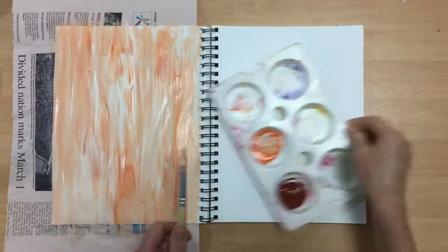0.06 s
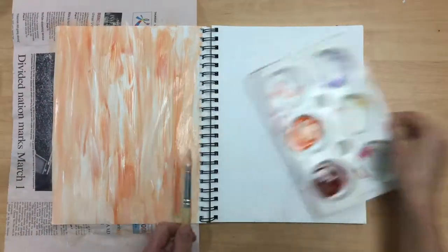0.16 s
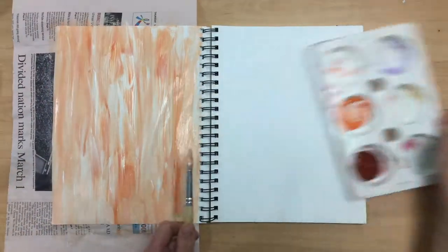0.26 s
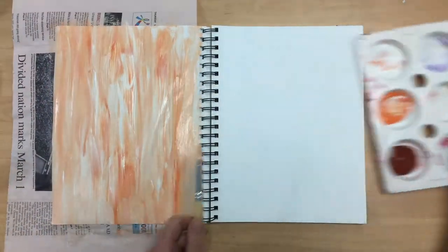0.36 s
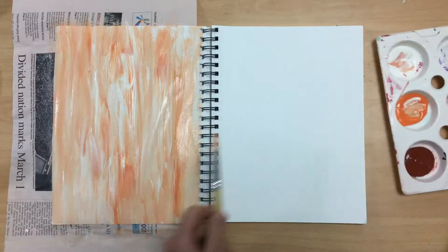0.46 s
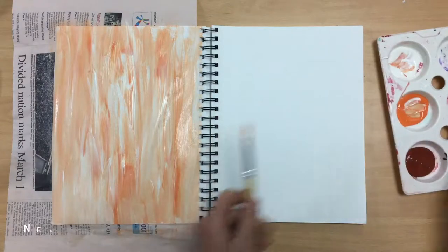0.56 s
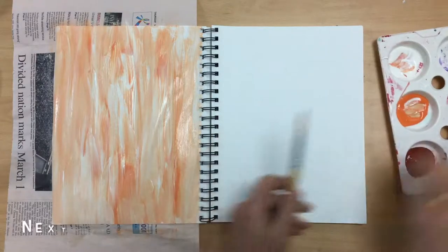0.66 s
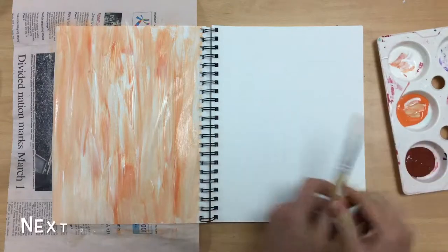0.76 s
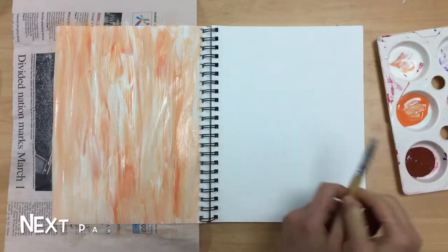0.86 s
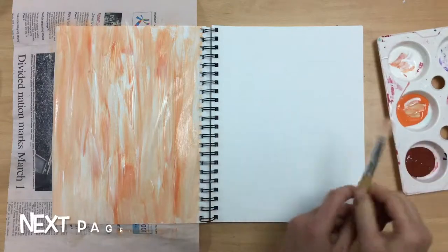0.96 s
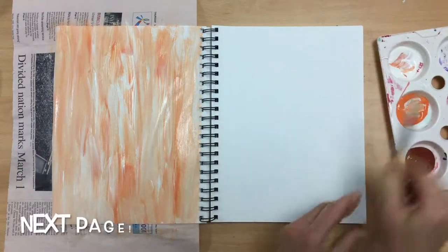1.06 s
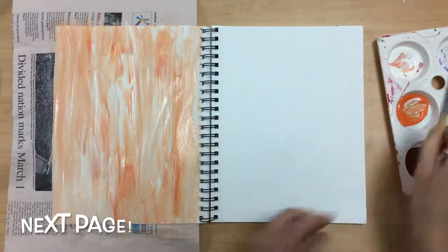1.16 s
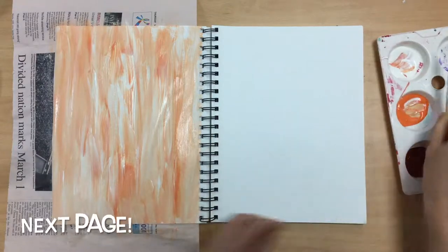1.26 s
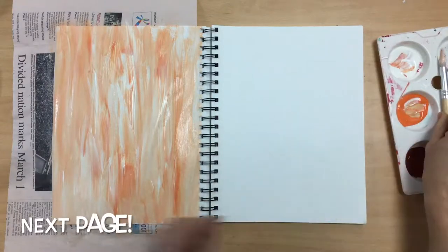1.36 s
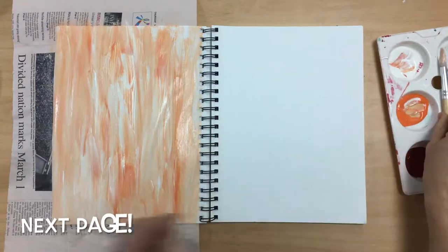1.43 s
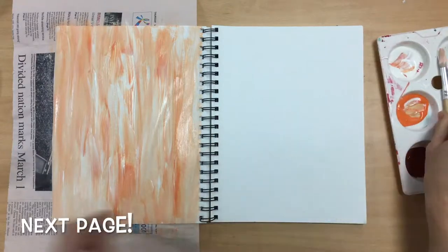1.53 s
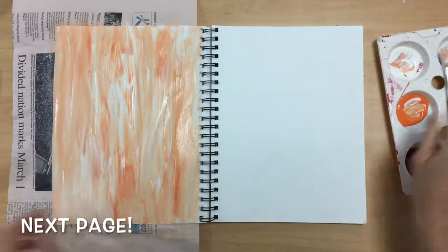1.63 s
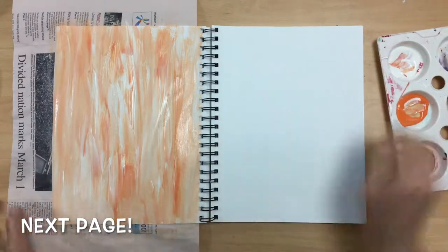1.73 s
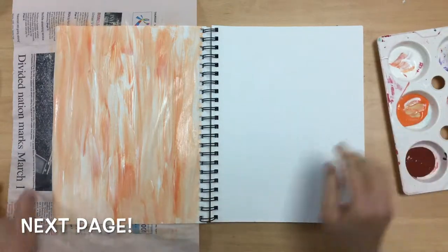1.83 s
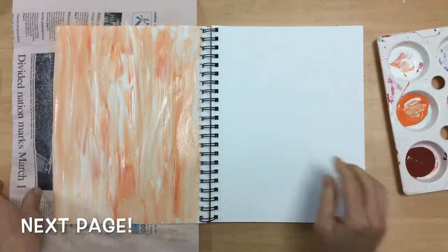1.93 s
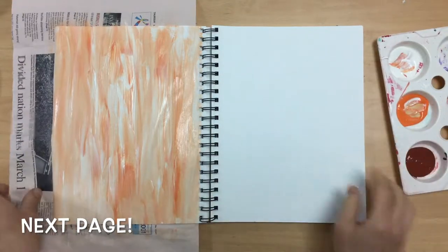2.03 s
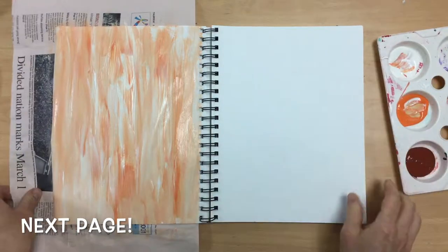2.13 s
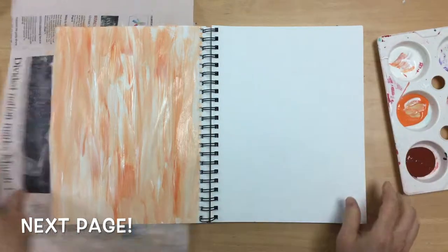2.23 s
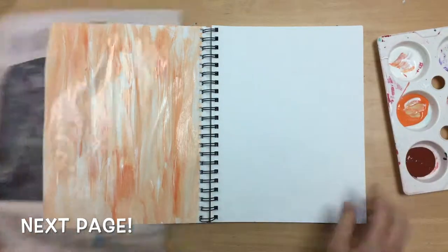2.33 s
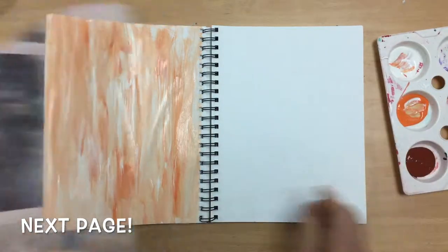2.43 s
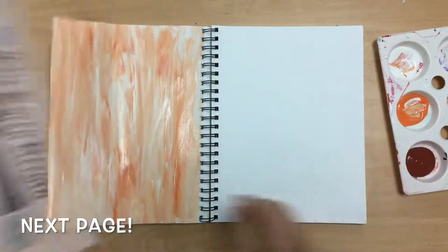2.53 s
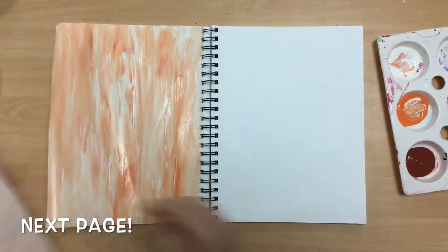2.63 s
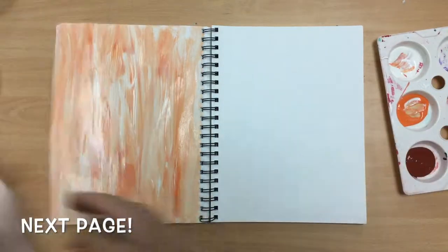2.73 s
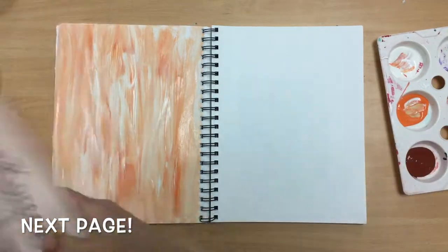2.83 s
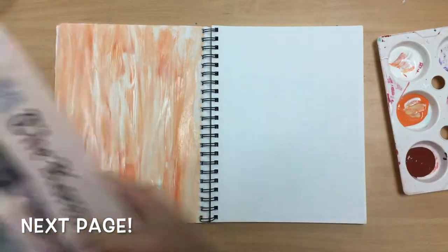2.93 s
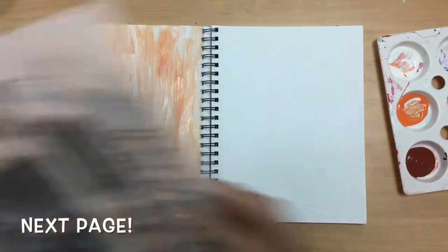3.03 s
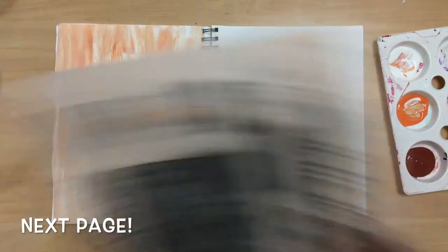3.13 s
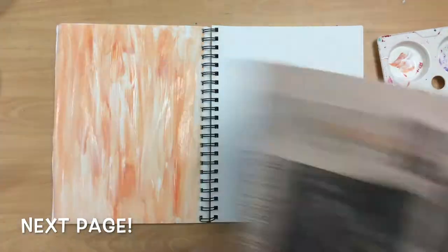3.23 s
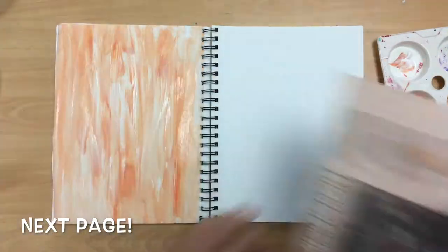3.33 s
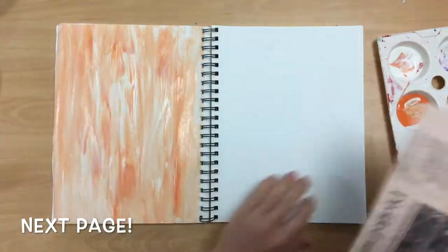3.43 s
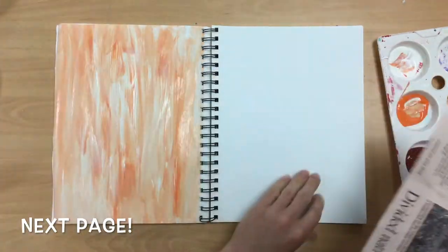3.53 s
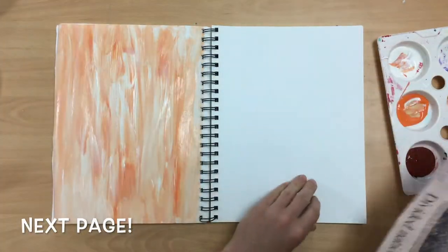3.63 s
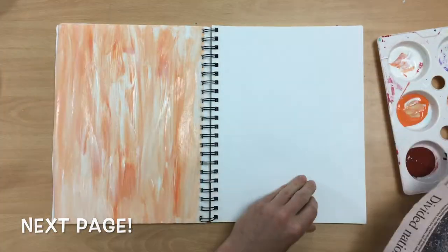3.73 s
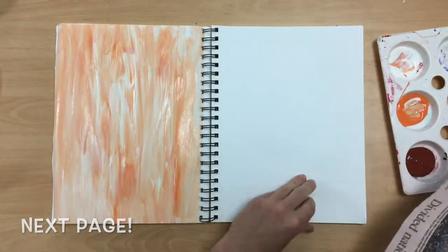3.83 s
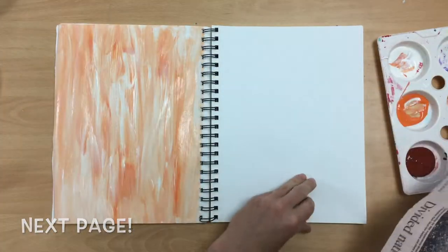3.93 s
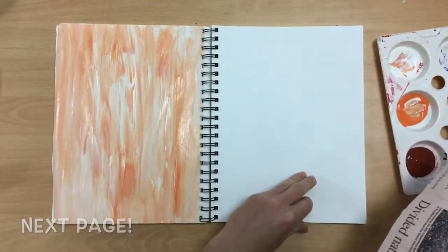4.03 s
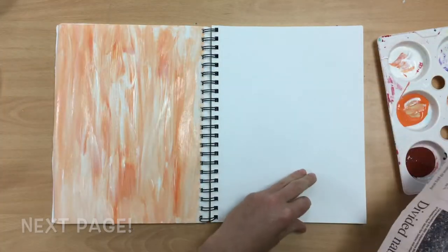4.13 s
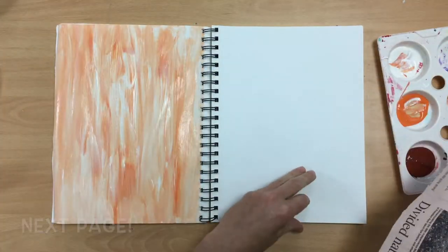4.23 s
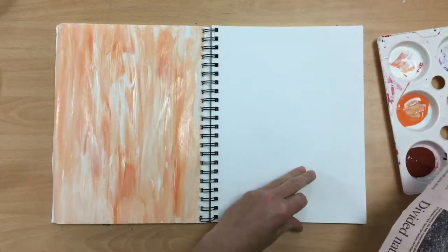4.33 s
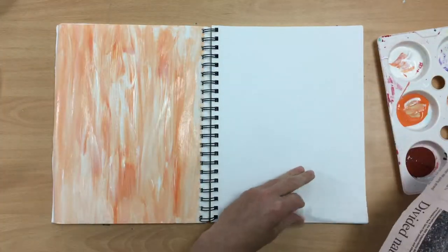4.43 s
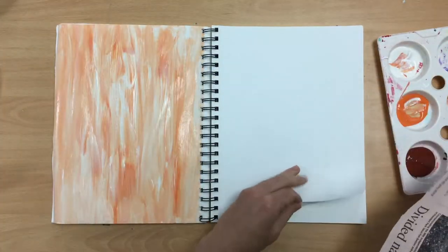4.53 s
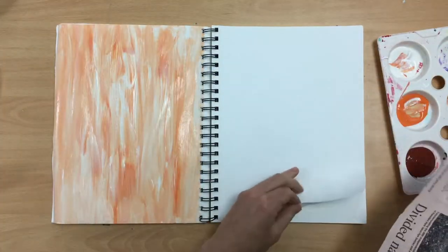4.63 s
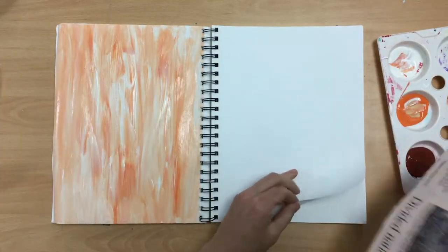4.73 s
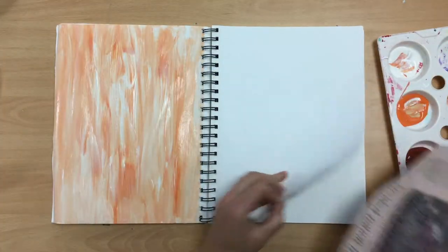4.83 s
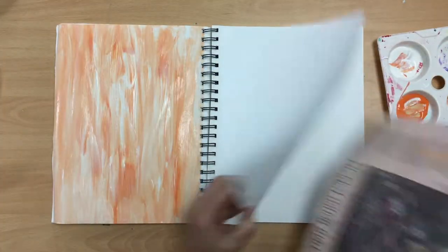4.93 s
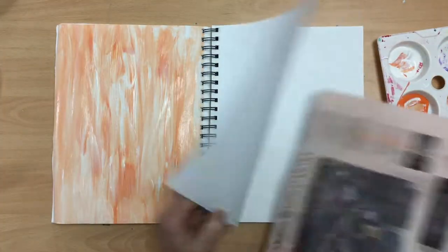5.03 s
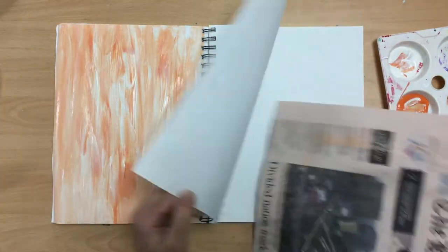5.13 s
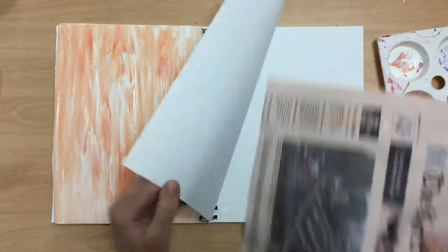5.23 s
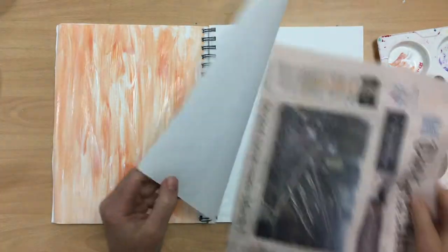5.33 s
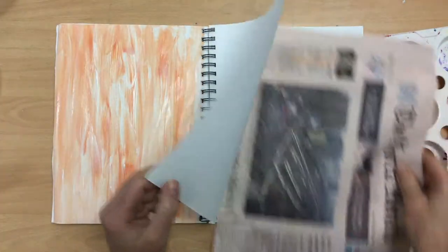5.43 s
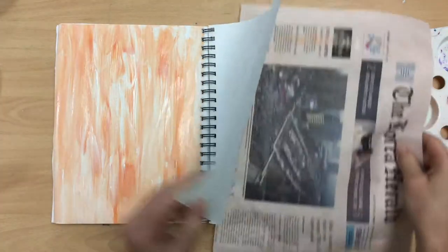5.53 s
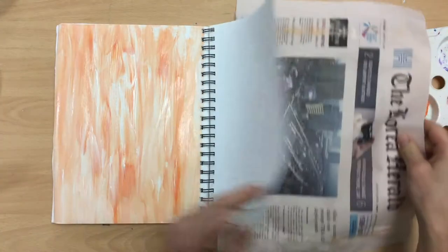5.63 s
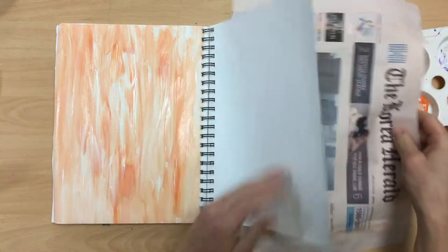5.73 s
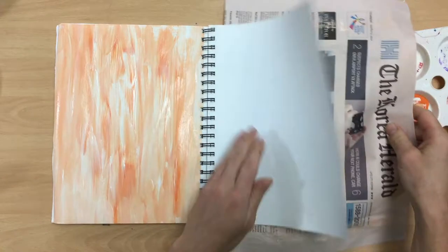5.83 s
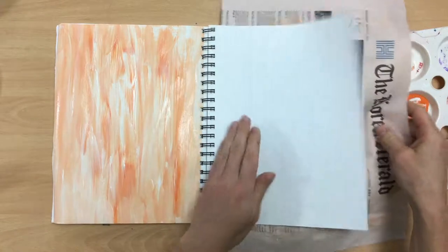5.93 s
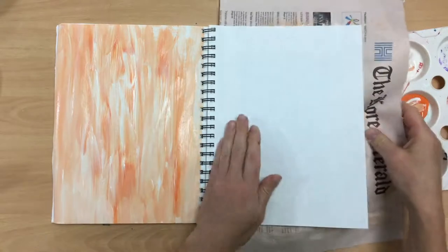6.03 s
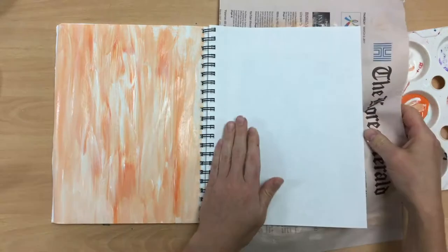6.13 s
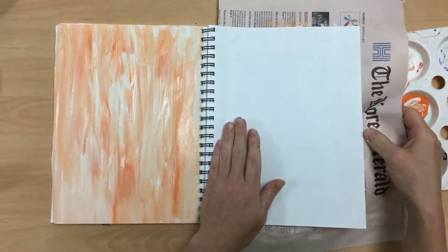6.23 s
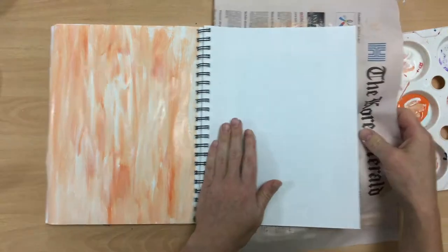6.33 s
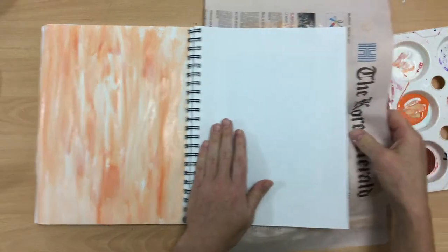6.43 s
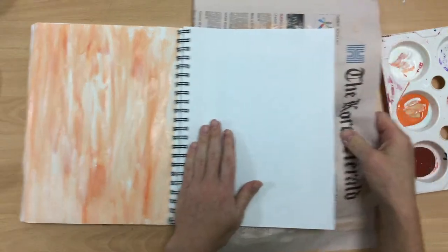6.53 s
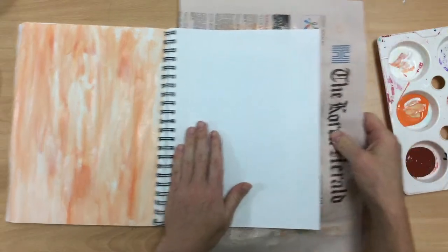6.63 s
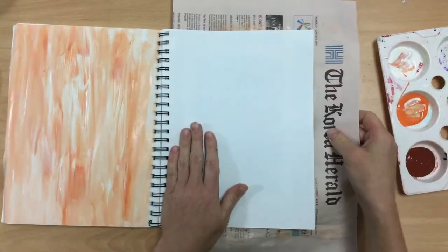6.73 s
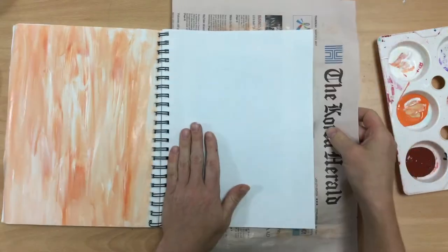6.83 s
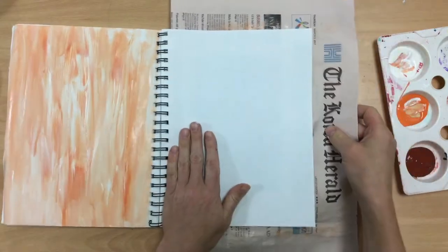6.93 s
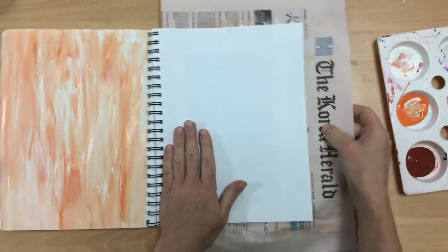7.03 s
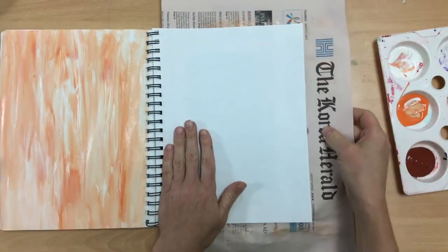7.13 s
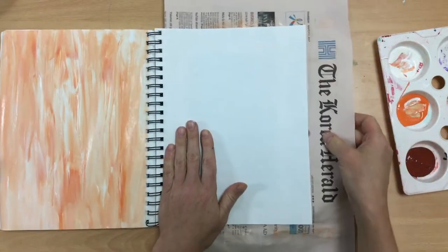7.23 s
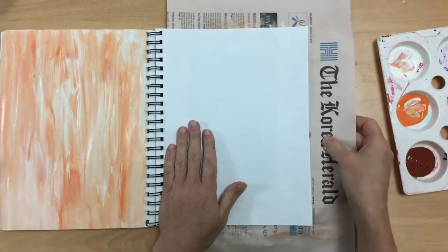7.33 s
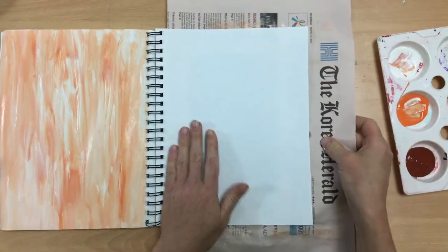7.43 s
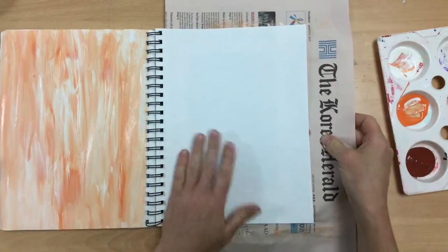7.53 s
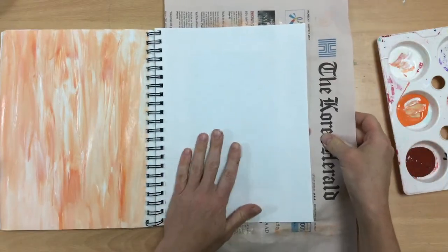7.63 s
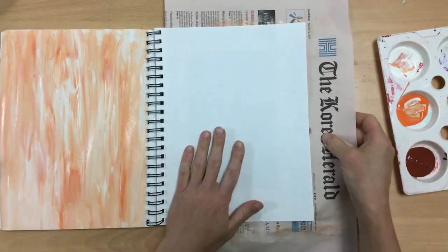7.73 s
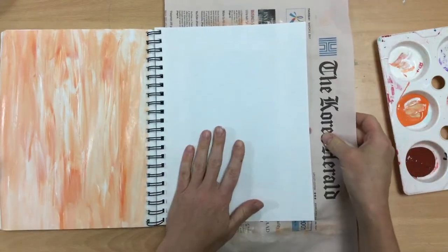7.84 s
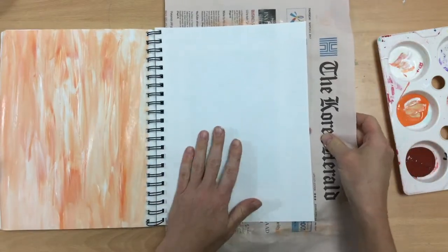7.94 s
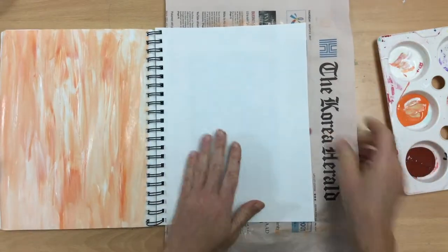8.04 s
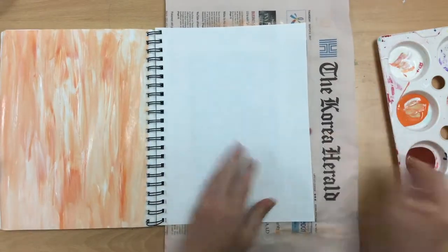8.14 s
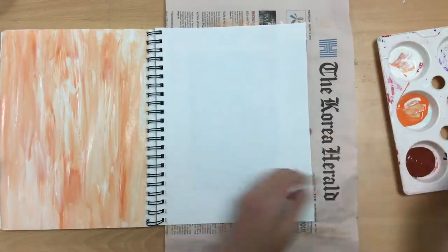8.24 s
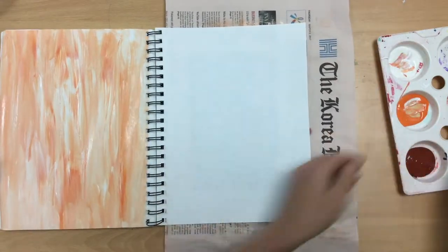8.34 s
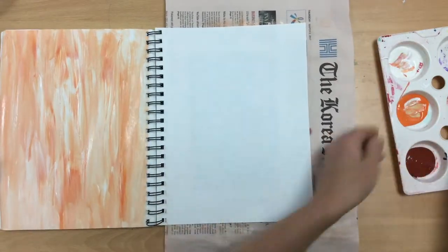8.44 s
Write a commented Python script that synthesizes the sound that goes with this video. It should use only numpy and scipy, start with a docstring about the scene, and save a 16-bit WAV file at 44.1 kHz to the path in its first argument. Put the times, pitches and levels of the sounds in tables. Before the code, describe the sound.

Close by, hard plastic clacks and light brush taps give way to loud newspaper rustling, then softer page turning and smoothing over a low hum.

```python
"""A wooden table in a small room, heard close: the direct sound outweighs the echoes, and a machine hums low.
First a plastic palette is slid off a sketchbook and set down, and a brush drops into it and rolls:
short clacks over quickly dying resonances. From about 2 s a sheet of newspaper is pulled out from under a page,
waved across and pushed in under the next page, which a hand pats flat: friction, crackles, flapping and snaps.
Sine tones make the hum and filtered noise the air of the room, throughout."""
import sys
import numpy as np
from scipy import signal
from scipy.fft import rfft, irfft
from scipy.io import wavfile
from scipy.ndimage import uniform_filter1d

SR = 44100
rng = np.random.default_rng(int(sys.argv[2]) if len(sys.argv) > 2 else 0)


def generate_wav(signal):
    """Clip the signal to [-1, 1] and save it as 16-bit WAV at the path in sys.argv[1]."""
    frames = np.transpose(np.atleast_2d(signal))
    scaled = np.clip(frames, -1, 1) * 32767
    pcm = np.round(scaled).astype(np.int16)
    wavfile.write(sys.argv[1], SR, pcm)


N = 373527  # samples
BINS = np.fft.rfftfreq(4096, 1 / SR)  # Hz, the grid of every colour filter

# How the body of a sheet colours rubbing: hz, gain_db
RUB_COLOUR = [(100, -36), (300, -28.5), (550, -1.5), (800, -5), (1100, 0), (1500, -1), (2400, -1),
              (3500, -4.5), (5000, -11), (8000, -17), (15000, -39.5)]
# The swish of a slack edge: hz, gain_db
SWISH_COLOUR = [(300, -47.5), (1500, -22), (2800, -5), (4400, 1), (6500, -1.5), (9000, -7), (15500, -20)]
# The fizz of a taut edge: hz, gain_db
FIZZ_COLOUR = [(1000, -47), (4000, -11.5), (7500, 2), (10000, 1), (13000, 1.5), (15500, -10.5)]
# Broad folds flapping: hz, gain_db
FLAP_COLOUR = [(40, -42.5), (120, -21), (200, -5), (300, 3), (420, 0), (650, -18.5), (1100, -16.5),
               (4000, -51)]
# How freely the newspaper hangs: time_s, freedom (0 = pressed flat, 1 = in the air)
FREEDOM = [(1.9, .2), (2.1, 0.35), (2.52, .4), (2.62, 1), (3.1, 1), (3.35, 0.92), (3.6, 0.00027),
           (5.3, 0.1), (6.05, 0.71), (6.4, 0.053)]
FLAP_LYING_DB, FLAP_FREE_DB = -19.5, -1.5  # flapping against the rub
CRINKLE_LYING, CRINKLE_FREE = .35, 1  # crackling share of the rustle, 0-1
SPAN_WIDTH_HZ, SPAN_DB = 1000, -3  # the broad resonance of the bent span


def rustle(rub_db=-2.0, hiss_db=0, hiss_crackle=.45, tick_db=-2, crease_db=-5):
    """Fibre friction and crackles drive the sheet's body, its edge and its broad folds."""
    rub_gain, swish_gain, fizz_gain, span_hz = stroke_levels()
    free = np.interp(np.arange(N) / SR, *np.transpose(FREEDOM))
    share = CRINKLE_LYING + (CRINKLE_FREE - CRINKLE_LYING) * free
    ticks = crackles(per_s=760, spread_db=2.0, decay_s=.0004)
    facets = folds(low_hz=400, high_hz=7000, per_s=1000, spread_db=4.2, cycles=3.2, count=36)

    # the body of the sheet: buckling facets and ticks over smooth friction
    rub_colour = read(RUB_COLOUR, BINS)
    buckling = unit(colour(bend(facets, drift_db=6.5), rub_colour))
    grains = unit(buckling + amp(tick_db) * unit(colour(ticks, rub_colour)))
    friction = unit(colour(bend(rng.standard_normal(N), drift_db=5.5), rub_colour))
    rub = (np.sqrt(share) * grains + np.sqrt(1 - share) * friction) * rub_gain
    rub = rub + amp(SPAN_DB) * resonate(rub, span_hz, SPAN_WIDTH_HZ)

    # the sliding edge: sparks and smooth noise, heard as swish and brighter fizz
    edge_share = hiss_crackle * share
    small_facets = folds(low_hz=2820, high_hz=14700, per_s=590, spread_db=5.5, cycles=5.0, count=16)
    sparks = unit(ticks + small_facets)
    smooth = unit(bend(rng.standard_normal(N), drift_db=1.5))
    edge = np.sqrt(edge_share) * sparks + np.sqrt(1 - edge_share) * smooth
    swish = unit(colour(edge, read(SWISH_COLOUR, BINS))) * swish_gain
    fizz = unit(colour(edge, read(FIZZ_COLOUR, BINS))) * fizz_gain
    hiss = swish + fizz

    # small creases snap at random, louder the freer the sheet
    creases = crackles(per_s=60, spread_db=3.5, decay_s=.0012)
    creases = unit(colour(creases, read(SNAP_COLOUR, BINS))) * rub_gain * np.sqrt(share)

    # broad folds flap low, as hard as the sheet is moved
    flap = crackles(per_s=270, spread_db=-0.5, decay_s=.002)
    flap = unit(colour(flap, read(FLAP_COLOUR, BINS))) * rub_gain
    flap *= amp(FLAP_LYING_DB + (FLAP_FREE_DB - FLAP_LYING_DB) * free)

    rustling = amp(rub_db) * rub + amp(hiss_db) * hiss + amp(crease_db) * creases + flap
    return rustling * catching(depth_db=1.56, per_s=90)


# Each movement that slides or bends a sheet, in order: palette dragged off the page, brush carried over,
# newspaper gripped and pulled out, waved across, fingers at the page corner, page lifted and newspaper
# put under it, both pushed into place, hand smoothing the page and letting go. Levels before the mix gains:
# start_s, rise_s, hold_s, rub_db, edge_db, fizz_against_swish_db, resonance_hz
STROKES = [ (.02, 0.027, .01, -88, -81, 1, 2400), (0.074, 0.017, 0.18, -72.5, -69, 3, 1600),
           (.17, 0.072, 0.017, -72, -58.5, -1.5, 2400), (0.3, 0.044, 0.051, -74, -63.5, 0, 4000),
           (0.523, 0.028, .01, -90, -77, -8, 2500), (0.918, 0.042, .02, -98, -88, 5.5, 2487),
           (1.967, 0.023, 0.0046, -62.5, -68, 4, 1300), (2.084, 0.014, 0.065, -57.5, -57, -6, 3800),
           (2.177, 0.083, 0.033, -57, -57.5, -4.5, 3460), (2.285, 0.051, 0.17, -52.5, -53.5, -1.5, 1610),
           (2.57, 0.035, 0.14, -56.5, -64.5, -8, 1100), (2.759, 0.047, .01, -60.5, -78, -20, 2000),
           (2.915, 0.023, .17, -50, -56, -9, 1290), (3.181, 0.018, 0.021, -53.5, -53.5, -2, 1900),
           (3.22, 0.033, 0.1, -60.5, -61.5, -11, 1200), (3.45, .03, 0.045, -66.5, -69, -12, 3900),
           (3.573, .1, 0.08, -69.5, -79, -6, 1670), (3.806, 0.013, .005, -83.5, -79.5, 7.5, 2600),
           (3.912, 0.078, .25, -94, -85.5, 3.5, 1970), (4.5, 0.024, 0.015, -71.5, -76, -5.5, 2100),
           (4.614, 0.018, 0.014, -70, -71, -2, 2100), (4.672, 0.052, 0.099, -86.5, -80.5, -6, 2100),
           (4.822, 0.021, 0.073, -60.5, -61.5, -9, 4200), (4.923, 0.053, 0.043, -62, -69, -6, 4400),
           (5.023, 0.08, 0.029, -61, -62, -6, 1500), (5.149, 0.087, 0.25, -57.5, -59, -3.5, 2450),
           (5.23, 0.12, 0.099, -80, -55, -1, 3000), (5.446, 0.071, 0.068, -60, -69, -3, 1710),
           (5.652, 0.017, 0.12, -64, -65, -4, 2500), (5.853, 0.026, 0.022, -70.5, -70, -5, 1200),
           (5.925, 0.069, 0.093, -61.5, -65, -4, 1200), (6.146, .007, 0.0073, -59, -64, -4, 2400),
           (6.223, .012, 0.016, -70, -75, -5, 1400), (6.272, 0.16, 0.081, -65, -75, -4, 2430),
           (6.493, 0.12, .14, -60, -63, -3, 2220), (6.896, 0.0083, 0.043, -71.5, -75, -7.5, 2100),
           (6.996, 0.048, 0.017, -57, -61, -6, 1900), (7.136, .05, 0.089, -68.5, -70.5, -1, 2550),
           (7.276, 0.058, 0.26, -79.5, -81.5, -2, 2400), (7.645, 0.019, 0.035, -68.5, -69, -8, 1800),
           (7.788, 0.052, 0.07, -74.5, -88, 3, 2000), (7.967, .03, 0.049, -70, -66, -1, 2500),
           (8.052, 0.013, 0.038, -63.5, -68.5, 4, 2180), (8.247, 0.086, .1, -87, -100, -3.5, 1800),
           (8.416, 0.023, .04, -76.5, -75, 0, 2000)]


def stroke_levels():
    """Gains over time of rub, swish and fizz, and the stroke resonance averaged by rub power."""
    rub, swish, fizz, span = np.zeros((4, N))
    for start_s, rise_s, hold_s, rub_db, edge_db, fizz_db, hz in STROKES:
        power = gesture(rise_s, hold_s)
        slack = 1 / (1 + amp(fizz_db) ** 2)  # share of edge power in the swish
        add(rub, start_s, amp(rub_db) ** 2 * power)
        add(span, start_s, hz * amp(rub_db) ** 2 * power)
        add(swish, start_s, amp(edge_db) ** 2 * slack * power)
        add(fizz, start_s, amp(edge_db) ** 2 * (1 - slack) * power)
    return np.sqrt(rub), np.sqrt(swish), np.sqrt(fizz), span / (rub + 1e-30)


# A movement falls by 20 dB in this time; one that starts slowly also ends slowly
RELEASE_S, RELEASE_PER_RISE = .075, 0.41


def gesture(rise_s, hold_s):
    """Power of one hand movement: it gathers speed, holds, and dies away."""
    t = np.arange(SR) / SR
    release_s = RELEASE_S + RELEASE_PER_RISE * rise_s
    attack = np.minimum(t / rise_s, 1) ** 0.77
    release = amp(-20 * np.maximum(t - rise_s - hold_s, 0) / release_s)
    return (attack * release) ** 2


def crackles(per_s, spread_db, decay_s):
    """Random tiny buckles: noise bursts with sizes spread exponentially in dB and dying power."""
    sizes = amp(spread_db * np.minimum(rng.exponential(1, N), 4))
    sizes *= rng.random(N) < per_s / SR
    power = signal.lfilter([1], [1, -np.exp(-1 / (decay_s * SR))], sizes ** 2)
    return unit(np.sqrt(power) * rng.standard_normal(N))


def folds(low_hz, high_hz, per_s, spread_db, cycles, count):
    """Facets of many sizes buckle at random; each rings for a few cycles at its own pitch."""
    out, t = np.zeros(N), np.arange(2048) / SR
    for hz in np.geomspace(low_hz, high_hz, count):
        sizes = amp(spread_db * np.minimum(rng.exponential(1, N), 4))
        sizes *= rng.random(N) < per_s / count / SR
        # small facets cover a wider band, so more energy keeps the summed spectrum even
        ring = np.sqrt(hz) * energy_one(np.sin(2 * np.pi * hz * t) * np.exp(-hz * t / cycles))
        out += signal.oaconvolve(sizes, rng.choice([-1, 1]) * ring)[:N]
    return unit(out)


def bend(x, drift_db):
    """As a sheet bends, its resonances drift gently in and out."""
    z = signal.stft(x, nperseg=256)[2]
    drift = uniform_filter1d(rng.standard_normal(z.shape), size=2, axis=0)  # across frequency
    drift = unit(uniform_filter1d(drift, size=24, axis=1))  # along time
    return signal.istft(z * amp(drift_db * np.clip(drift, -2, 2)), nperseg=256)[1][:N]


def resonate(x, hz, width_hz):
    """A resonance of gain 1 that follows the curve hz."""
    turn = np.exp(2j * np.pi * np.cumsum(hz) / SR)
    r = np.exp(-np.pi * width_hz / SR)
    return 2 * (turn * signal.lfilter([1 - r], [1, -r], x / turn)).real


def catching(depth_db, per_s):
    """Paper catches and slips, so its level wavers at random."""
    steps = rng.standard_normal(3000)
    return amp(depth_db * np.interp(np.arange(N) / SR * per_s, np.arange(len(steps)), steps))


# The loudest creases and edges snapping through, levels before gain:
# start_s, level_db, fold_resonance_hz, treble_db
SNAPS = [(.428, -31.5, 2170, -2), (1.092, -56, 8940, 22), (1.984, -32, 1420, 0), (1.991, -22.5, 4630, 8.5),
         (2.1, -31.5, 2730, 15), (2.126, -28, 3800, 12), (2.133, -28, 5010, 15), (2.183, -18, 3100, 9.5),
         (2.252, -24, 4040, -1), (2.298, -23, 1600, -2.5), (2.326, -32, 1680, 14.5), (2.386, -23, 2355, 4),
         (2.487, -18, 4370, 11), (2.602, -27, 2110, -5), (2.666, -30.5, 1010, -1), (2.71, -23, 980, 1.5),
         (2.719, -22.5, 2030, -4), (2.835, -31.5, 1890, -9.5), (2.923, -39, 2280, 7.5),
         (2.955, -24.5, 2660, 11), (2.995, -24, 1460, -7), (3.039, -23.5, 1400, -3), (3.078, -22, 1380, 0),
         (3.083, -18.5, 4800, -5), (3.142, -28, 1710, -6), (3.202, -23, 6900, 13),
         (3.241, -32.5, 1890, -11), (3.294, -32.5, 1730, -7), (4.496, -46, 2030, -10),
         (4.809, -34.5, 2320, -12), (5.713, -32, 1340, -11), (5.774, -35, 1770, 8),
         (6.009, -33.5, 1040, 13), (6.032, -29.5, 1120, 0), (6.064, -29, 1280, 1), (6.098, -31.5, 1310, 6),
         (6.147, -31, 2370, -1), (6.752, -29, 2080, -7), (7.042, -27.5, 1720, -16),
         (7.115, -39.5, 2460, -13), (7.512, -46.5, 1620, -21), (7.846, -43, 1750, -7),
         (7.998, -38, 3180, 0), (8.127, -37.5, 4300, 2)]
# Colour of the snaps and small creases: hz, gain_db
SNAP_COLOUR = [(60, -46.5), (200, -11.5), (600, -1), (1400, 8.5), (4400, 4), (7000, -1), (9000, -3),
               (15500, -11)]
# A bigger buckle takes longer to die: decay at the reference level, and the level step that doubles it
SNAP_DECAY_S, SNAP_REF_DB, SNAP_DOUBLING_DB = 0.0034, -27.5, 29


def crease_snaps():
    """Stiff creases buckle through, the stronger ones dying more slowly."""
    buckles = []
    for s, db, hz, treble_db in SNAPS:
        decay_s = SNAP_DECAY_S * 2 ** ((db - SNAP_REF_DB) / SNAP_DOUBLING_DB)
        buckles.append((s, db, hz, treble_db, decay_s))
    return paper_hits(buckles, SNAP_COLOUR, fold_db=7.5, fold_octaves=0.092, gain_db=6.5)


# Soft scuffs and bumps of fingers, sheets and palette on the book, levels before gain:
# start_s, level_db, resonance_hz, treble_db, decay_s
PATS = [(.106, -53, 1390, 26, .005), (.128, -56, 1690, 6, 0.0092), (2.645, -38.5, 306, -28, 0.013),
        (2.7, -38.5, 310, -5, 0.0056), (2.769, -45.5, 323, 3, 0.0079), (3.941, -57, 1730, -4, .0067),
        (3.954, -56.5, 655, -7.5, 0.004), (5.005, -47.5, 1300, 8, 0.027), (5.536, -44.5, 640, 8, 0.0012),
        (5.797, -48, 745, -12, 0.044), (6.015, -44.5, 328, -3, 0.035), (6.666, -42.5, 1570, 27, 0.011),
        (7.017, -46.5, 1140, 2, .016), (7.667, -53, 1700, 0, 0.0097), (7.85, -54, 311, -29.5, 0.075)]
# Colour of the pats: hz, gain_db
PAT_COLOUR = [(40, -42.5), (130, -13), (300, -6.5), (700, -1), (1600, -3.5), (3000, -8), (8000, -29.5),
              (15000, -40)]


def soft_pats():
    """Soft contacts are short noise bursts with one broad resonance each."""
    return paper_hits(PATS, PAT_COLOUR, fold_db=14.0, fold_octaves=0.39, gain_db=19.5)


def paper_hits(rows, spectrum, fold_db, fold_octaves, gain_db):
    """Single impacts on paper, each coloured by a resonance of its own."""
    out, treble = np.zeros(N), 1 - 1 / (1 + (BINS / 4000) ** 3)
    for s, db, hz, treble_db, decay_s in rows:
        fold = fold_db / (1 + (np.log2((BINS + 1) / hz) / fold_octaves) ** 2)
        hit = colour(crack(decay_s), read(spectrum, BINS) + fold + treble_db * treble)
        add(out, s, amp(db + gain_db) * energy_one(hit))
    return out


# The palette meets the table, levels before gain: start_s, level_db, bass_db, treble_db, ring_db
KNOCKS = [(.4337, -13, 1.5, 7.5, -8.5), (.4450, -10.5, 5.5, 12.5, -13.5), (.4475, -15, -4, 0, -12.5),
          (.4708, -17.5, 4.5, -0.5, -12), (.4845, -26.5, 12, 0.5, -14), (.6555, -32, 16, -4, -18),
          (.7358, -23, 5, 17.5, 6)]
# Colour of the knocks: hz, gain_db
KNOCK_COLOUR = [(80, -38.5), (160, -18.5), (330, -9), (450, -18), (590, 1.5), (760, -3.5), (920, -14),
                (1200, 2), (2050, 3.5), (2750, -4), (4500, -21), (8500, -37), (10000, -33), (15500, -42.5)]


def palette_knocks():
    """Hard plastic clacks on the wood and sets tray and table top ringing."""
    return plastic_hits(KNOCKS, KNOCK_COLOUR, contact_s=0.0013, gain_db=10.0, room_db=-6.5)


# The brush handle taps in the palette, levels before gain: start_s, level_db, bass_db, treble_db, ring_db
TAPS = [(.5845, -21.5, -4, -0.5, -16), (1.4325, -25.5, 15, 36, -4.5), (1.4348, -18, -2, 5, -23),
        (1.639, -44.5, -10, 1, -9), (1.660, -42.5, -19, -9, -30), (1.7005, -39, -15, -11, -27),
        (1.875, -52, -4, -37, -27), (1.9005, -51, 7, -27, -17), (1.9255, -40.5, -4, -20, -24),
        (1.963, -40.5, 3, -29, -20)]
# Colour of the taps: hz, gain_db
TAP_COLOUR = [(60, -39), (260, -33.5), (335, -3), (430, -18), (590, -1.5), (700, -9.5), (900, -4.5),
              (1080, -10), (1330, 0.5), (1520, -0.5), (1720, 5), (2000, -8), (2800, -12), (3700, -23),
              (6000, -32.5), (15000, -48.5)]


def brush_taps():
    """The handle strikes the tray with a short clack and excites the same resonances."""
    return plastic_hits(TAPS, TAP_COLOUR, contact_s=0.00195, gain_db=11.5, room_db=-10.0)


# The brush handle rocks in its well: start_s, rise_s, hold_s, level_db
ROLLS = [(1.56, 0.041, 0.054, -69), (1.803, 0.088, 0.037, -71)]


def brush_roll():
    """Tiny bumps of the rolling handle keep the plastic well ringing."""
    power = np.zeros(N)
    for start_s, rise_s, hold_s, db in ROLLS:
        add(power, start_s, amp(db) ** 2 * gesture(rise_s, hold_s))
    well_db = read(TAP_COLOUR, BINS) - 12 * abs(np.log2((BINS + 1) / 1700))  # peaks near 1700 Hz
    bumps = crackles(per_s=620, spread_db=6.0, decay_s=0.00079)
    return unit(colour(bumps, well_db)) * np.sqrt(power)


# The damped resonances of palette and table top: pitch_hz, width_hz, level_db
TRAY = [(149, 52, -1.5), (333, 94, -2.5), (650, 50, -7.5), (839, 42, 3.5), (1037, 90, 2), (1258, 160, -4),
        (1800, 300, -12), (2150, 250, -12.5), (3350, 420, -19)]
TRAY_T60 = 0.2  # s


def plastic_hits(rows, spectrum, contact_s, gain_db, room_db):
    """Hard contacts: a short clack, the crowded, quickly dying modes of tray and table, and the room."""
    out, t = np.zeros(N), np.arange(SR // 4) / SR
    bass = 1 / (1 + (BINS / 1000) ** 4)
    treble = 1 - 1 / (1 + (BINS / 4000) ** 4)
    modes = [amp(db) ** 2 / (1 + ((BINS - hz) / width) ** 2) ** 2 for hz, width, db in TRAY]
    body_db = 10 * np.log10(sum(modes))
    for s, db, bass_db, treble_db, ring_db in rows:
        clack_db = read(spectrum, BINS) + bass_db * bass + treble_db * treble
        clack = colour(crack(contact_s), clack_db)
        ring = colour(rng.standard_normal(len(t)) * amp(-60 * t / TRAY_T60), body_db)
        add(out, s, amp(db + gain_db) * (energy_one(clack) + amp(ring_db) * energy_one(ring)))
        # every blow lands on another spot, so it has its own echoes
        add(out, s, amp(db + gain_db + room_db) * energy_one(colour(echoes(), clack_db)))
    return out


def crack(decay_s):
    """A dying burst of noise, as from tiny impacts, with a smoothed-even spectrum."""
    t = np.arange(SR // 4) / SR
    z = rfft(rng.standard_normal(len(t)) * np.exp(-t / decay_s))
    z /= np.sqrt(uniform_filter1d(abs(z) ** 2, size=250) + 1e-12)
    return irfft(z, len(t)) * (1 - t / t[-1]) ** 4


# How long the small room rings: hz, t60_s
ROOM_T60 = [(150, 1), (600, 0.21), (2000, 0.25), (6000, .28), (15000, 0.23)]


def echoes(early_db=2, early_s=0.0095):
    """Dense early echoes from table and near walls, then a short tail whose decay varies with pitch."""
    hz, t, z = signal.stft(rng.standard_normal(SR // 2), SR, nperseg=256)
    tail = signal.istft(z * amp(-60 * t / read(ROOM_T60, hz)[:, None]), SR, nperseg=256)[1]
    t = np.arange(len(tail)) / SR
    early = 1 + amp(early_db) * np.exp(-t / early_s)
    return energy_one(tail * early * np.minimum(t / 0.0029, 1))


def room(x):
    """The room as heard from one spot."""
    return signal.fftconvolve(x, echoes())[:N]


def moving_room(x, count=3):
    """The sound passes steadily from one pattern of echoes to the next, as when things move."""
    turn = np.arange(N) / SR * 2.3  # half turns
    patterns = [room(x * np.cos(np.pi * (turn + k / count))) for k in range(count)]
    return sum(patterns) * np.sqrt(2 / count)


# The tones of the machine: pitch_hz, level_db (rms)
HUM = [(73.64, -76.8), (100.86, -69.8), (119.89, -58.1), (138.9, -72.2), (158.02, -75.7), (225.56, -81.7)]
# The rumble and hiss of the room, relative: hz, level_db
ROOM_AIR = [(25, -18.5), (45, -8.5), (80, 3), (130, 4.5), (180, -6), (250, -12.5), (350, -19.5),
            (550, -29.5), (900, -32.5), (1700, -33), (3000, -41), (7000, -46.5), (13000, -46),
            (15500, -55.5)]


def hum(air_db=-61):
    """Steady sine tones of the machine over noise shaped into the rumble and hiss of the room."""
    t = np.arange(N) / SR
    tones = sum(amp(db) * np.sqrt(2) * np.sin(2 * np.pi * (hz * t + rng.random())) for hz, db in HUM)
    air_gain = amp(read(ROOM_AIR, np.fft.rfftfreq(N, 1 / SR)))
    air = irfft(rfft(rng.standard_normal(N)) * air_gain, N)
    return tones + amp(air_db) * unit(air)


def amp(db):
    """Decibels to gain."""
    return 10 ** (np.asarray(db) / 20)


def unit(x):
    """Scales to rms 1."""
    return x / np.sqrt(np.mean(x ** 2) + 1e-20)


def energy_one(x):
    """Scales to energy 1."""
    return x / np.linalg.norm(x)


def read(points, hz):
    """A spectrum, joined by straight lines on a log-frequency axis."""
    f, value = np.transpose(points)
    return np.interp(np.log(hz + 1), np.log(f), value)


def add(mix, s, sound):
    """Mixes a sound in at time s."""
    part = mix[round(s * SR):][:len(sound)]
    part += sound[:len(part)]


def colour(x, db):
    """Causal minimum-phase filter with the gain db on BINS, made by folding the cepstrum."""
    cepstrum = irfft(np.log(amp(np.maximum(db, -100))))
    half = len(BINS) - 1
    cepstrum[1:half] *= 2
    cepstrum[half + 1:] = 0
    return signal.fftconvolve(x, irfft(np.exp(rfft(cepstrum))))[:len(x)]


def scene():
    """Palette, brush and paper in the small room, over the hum."""
    paper = crease_snaps() + soft_pats() + rustle()
    plastic = palette_knocks() + brush_taps() + brush_roll()
    paper_room = moving_room(amp(-13.0) * paper)
    return (plastic + paper + paper_room + hum())[None]


EDGE_HZ = 15700


def record(dry):
    """The microphone channel's band limit: a steep low-pass at EDGE_HZ."""
    lowpass = signal.firwin(511, EDGE_HZ, window=("kaiser", 9), fs=SR)
    return signal.oaconvolve(dry, lowpass[None], "same")


dry = scene()
out = record(dry)
generate_wav(out)
```